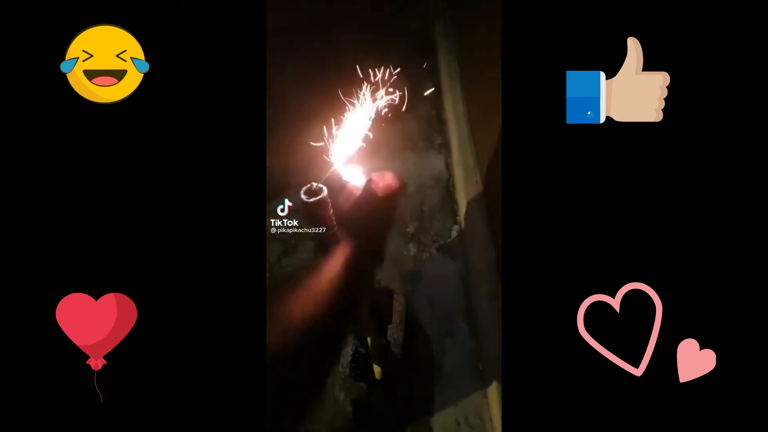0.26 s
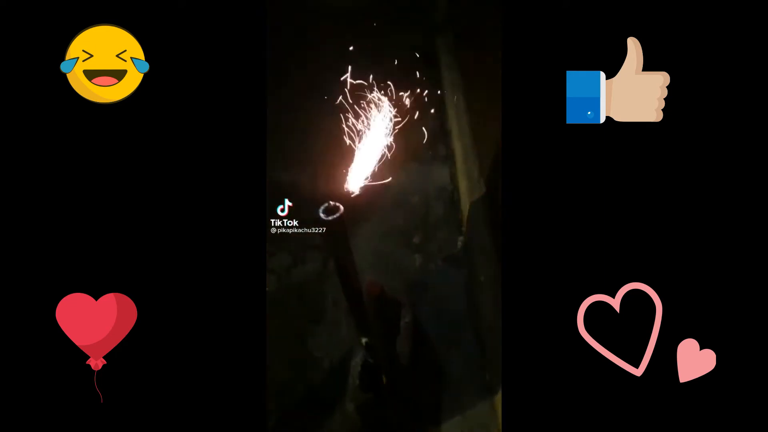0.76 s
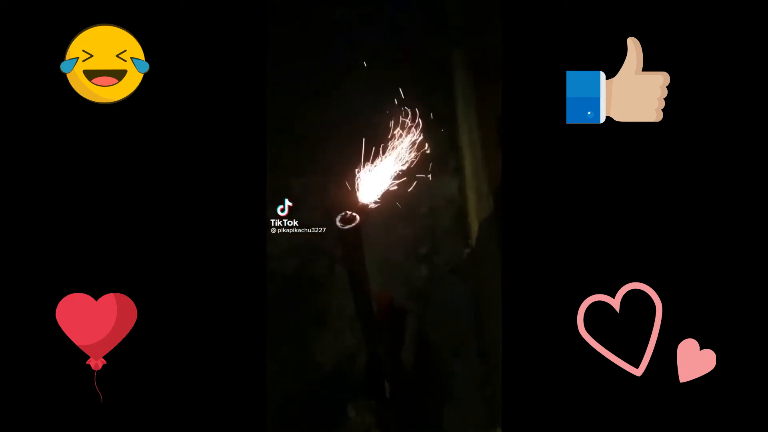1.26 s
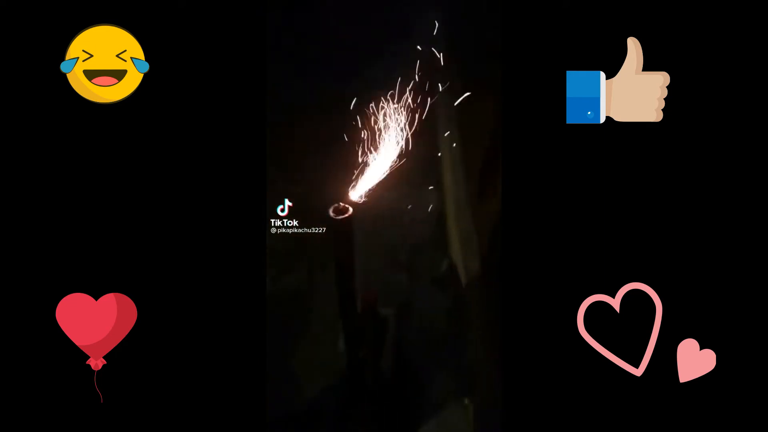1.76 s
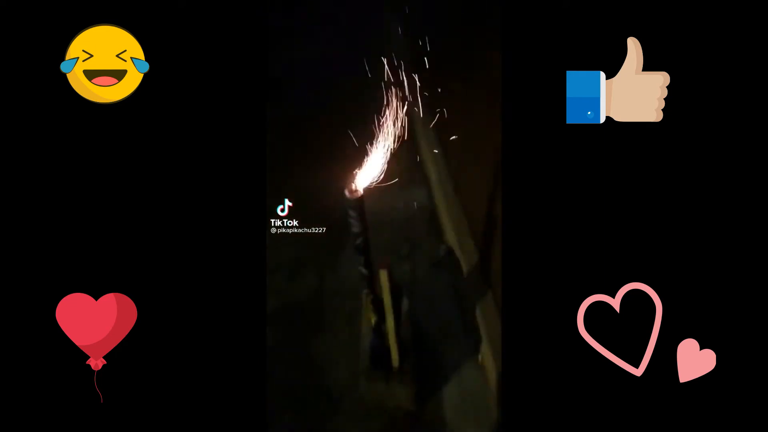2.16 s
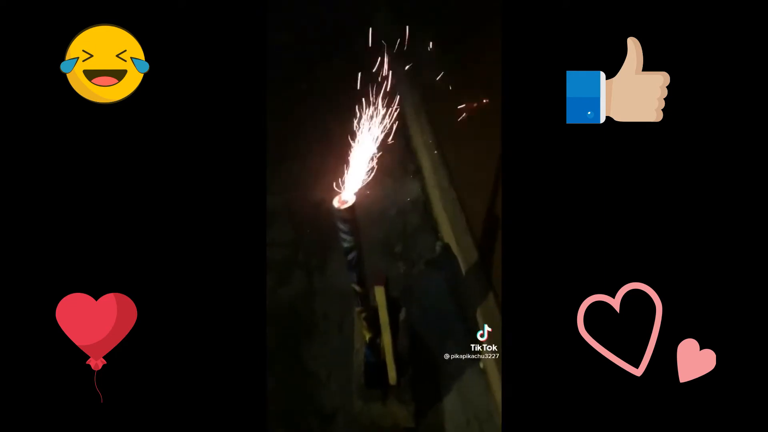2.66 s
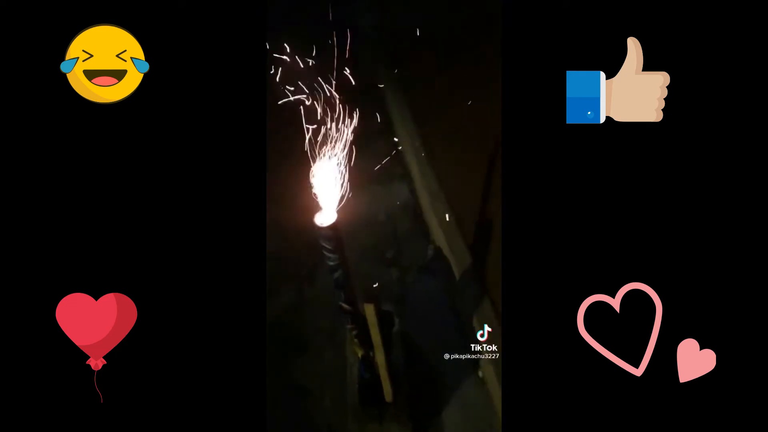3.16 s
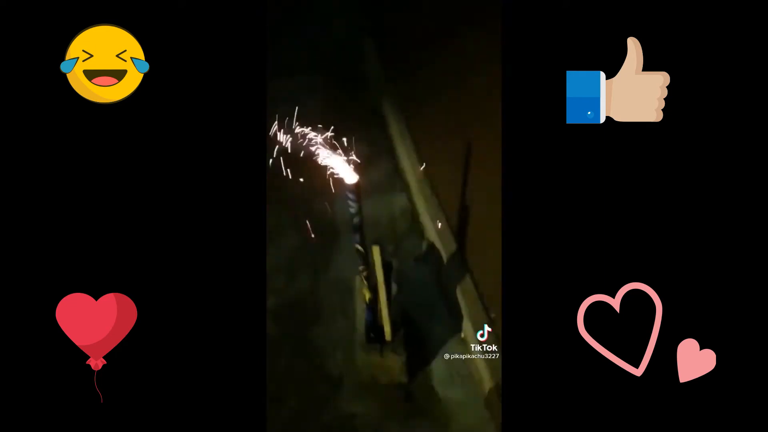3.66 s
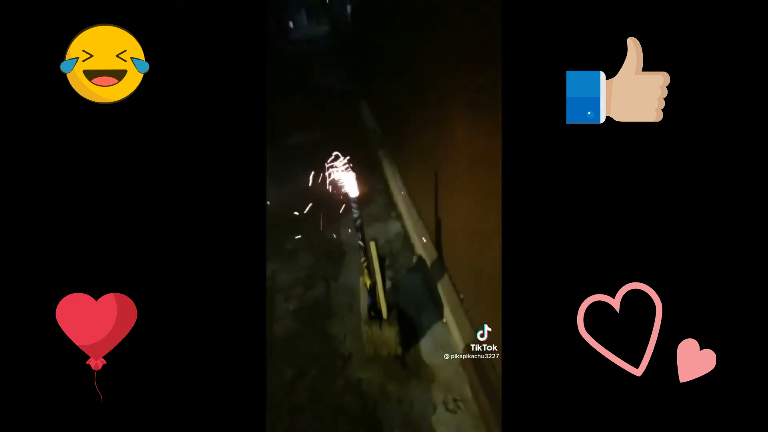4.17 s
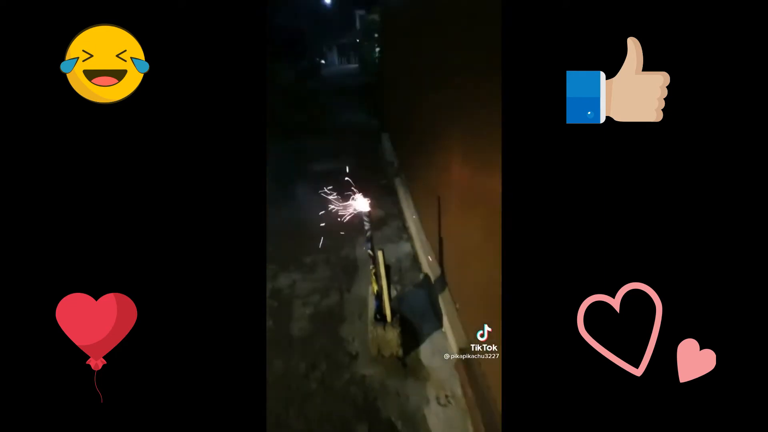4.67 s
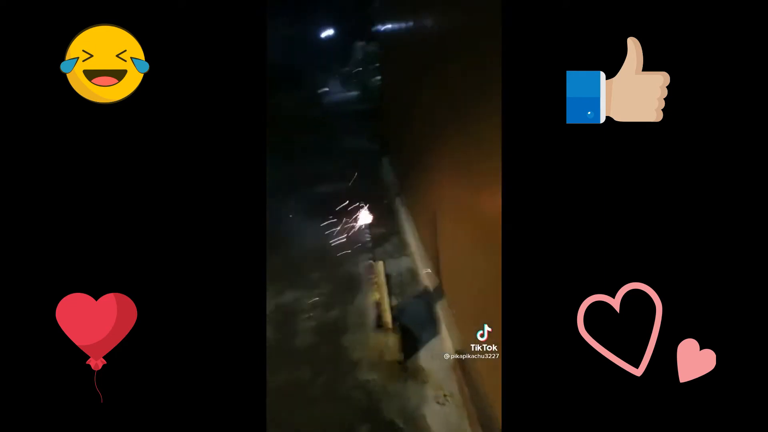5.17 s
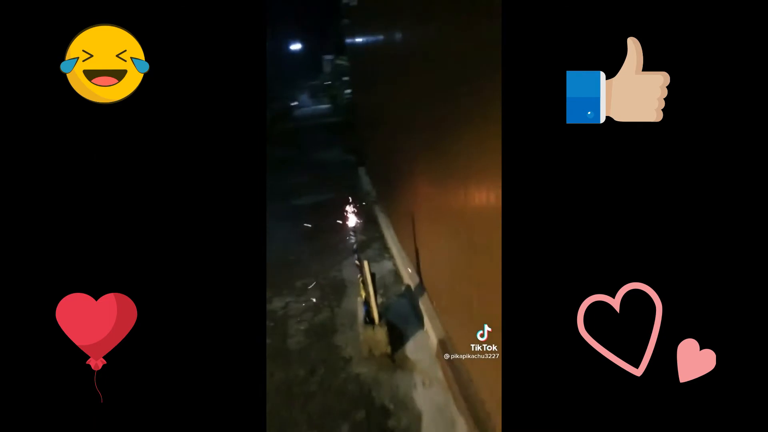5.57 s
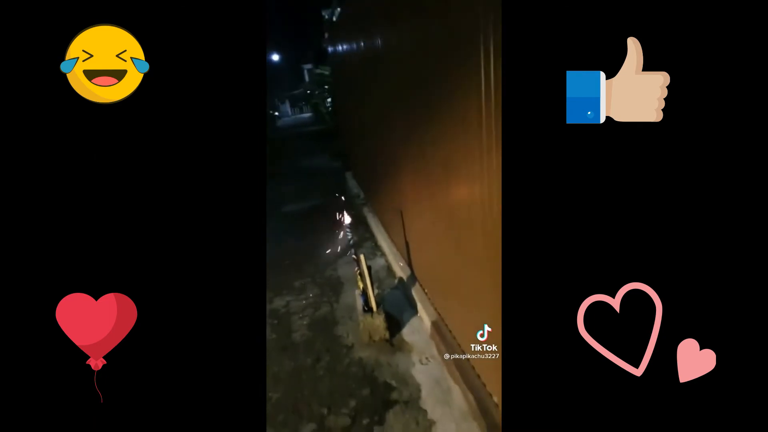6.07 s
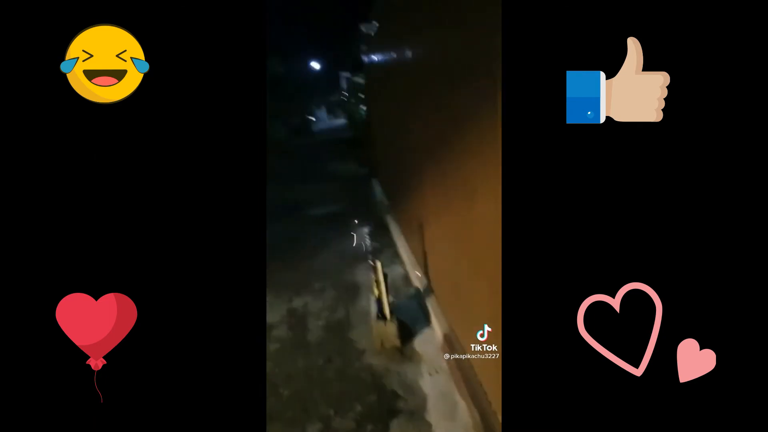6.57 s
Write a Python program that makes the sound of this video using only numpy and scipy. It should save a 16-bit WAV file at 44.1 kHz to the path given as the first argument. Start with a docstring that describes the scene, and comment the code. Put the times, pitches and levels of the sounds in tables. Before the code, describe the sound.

Bright sputtering fuse hiss fades down a tube amid low wind thumps, then one dry firework bang echoes and crickets chirp on.

```python
"""Outdoors at night, on a street: a firework fuse burns, its spark jet (coloured noise plus random grains) hissing and
spitting. The jet turns hollow as the flame sinks into the tube, and fades.
The charge goes off with one sharp crack, built of noise bursts, that echoes along the street.
Gusts of low noise and short pressure pulses buffet the single microphone.
Behind lie crickets (swept sine strokes over a noise chorus), air noise and a faint hum of sines."""
import sys
import numpy as np
from scipy import signal
from scipy.fft import rfft, irfft, next_fast_len
from scipy.io import wavfile
from scipy.ndimage import uniform_filter1d, map_coordinates

SR = 44100
rng = np.random.default_rng(int(sys.argv[2]) if len(sys.argv) > 2 else 0)


def generate_wav(sig):
    """Save sig (samples, or channels by samples) to the path in sys.argv[1] as 16-bit PCM at SR."""
    pcm = np.round(np.clip(np.atleast_2d(sig).T, -1, 1) * 32767).astype(np.int16)
    wavfile.write(sys.argv[1], SR, pcm)


N = 300762
T = np.arange(N) / SR
SLOW_T = np.arange(0, N / SR + .001, .00025)   # coarse clock [s]

# flame sinking into the tube: (time [s], depth [0-1], first tube resonance [Hz])
SINKING = [(0, 0.04, 1800), (2.5, 0.02, 1720), (2.9, 0.16, 1670), (3.3, 0.17, 1810), (3.65, 0.37, 1910),
           (4.15, 0.53, 1690), (4.7, 0.85, 2040), (5.3, 0.82, 1920), (6.0, 1, 1920)]
# short level dips of hiss and background air: (time [s], dip [dB], length [s])
FALTERS = [(.153, 3, .03), (.8, 2.5, .06), (1.151, 3, .02), (1.267, 5, .024), (1.454, 4, .022),
           (1.591, 4, .026), (2.01, 5, .018), (2.151, 4, .018), (2.637, 2.5, .02), (2.846, 2.5, .016),
           (2.892, 4, .02), (3.495, 8, .02), (4.426, 5, .02), (4.566, 6, .024), (4.717, 5, .032),
           (4.798, 3, .016), (4.87, 7, .018), (4.937, 3, .014), (5.007, 4, .016), (5.261, 5, .018),
           (5.309, 7, .018), (5.494, 6, .018), (5.55, 4, .025), (5.587, 4, .018), (5.657, 9, .016),
           (5.748, 3, .018)]
# short level dips of the far echo and background air: (time [s], dip [dB], length [s])
AIR_DIPS = [(6.021, 9, .03), (6.33, 5, .022), (6.422, 10, .052), (6.774, 6, .018)]
# bang and its returns from walls: (time [s], rms at peak [dB], t60 [s], bass edge [Hz], treble edge [Hz])
BANG_ARRIVALS = [(6.1246, -39, 0.28, 100, 14000), (6.125, -38.5, 0.016, 200, 14000),
                 (6.1285, -32, 0.018, 200, 14000), (6.1295, -34.5, 0.018, 5000, 14000),
                 (6.1335, -38, .012, 200, 14000), (6.141, -40, .03, 300, 6000),
                 (6.154, -39.5, .04, 2000, 14000), (6.163, -42, .06, 300, 7000),
                 (6.173, -41, .025, 1500, 9000), (6.1905, -43.5, .04, 1200, 3000),
                 (6.192, -52, .2, 4000, 14000), (6.218, -41.5, 0.025, 2000, 2700),
                 (6.2242, -42, 0.02, 1400, 8000), (6.252, -51, 0.08, 1500, 2600),
                 (6.259, -48, 0.06, 1550, 1950), (6.32, -58, 0.1, 1500, 2200)]


def from_db(db):
    """Decibels to gain."""
    return 10 ** (np.asarray(db) / 20)


def rms_one(x):
    """Scale to rms 1."""
    return x / np.sqrt(np.mean(x ** 2) + 1e-20)


def in_time(rows, t=T):
    """Each column of a curve at the times t."""
    s, *columns = np.transpose(rows)
    return [np.interp(t, s, c) for c in columns]


def at_hz(points, hz):
    """A spectrum in dB, straight on a log-frequency axis."""
    f, db = np.transpose(points)
    return np.interp(np.log(np.maximum(hz, 1)), np.log(f), db)


def noise(spectrum, source=None):
    """White noise, or another source, given a colour that falls away beyond its ends; rms 1."""
    source = rng.standard_normal(N) if source is None else source
    hz = np.arange(N // 2 + 1) * SR / N + 1e-3
    low_skirt = np.minimum(1, hz / spectrum[0][0]) ** 2
    high_skirt = np.minimum(1, spectrum[-1][0] / hz) ** 4
    gain = from_db(at_hz(spectrum, hz)) * low_skirt * high_skirt
    return rms_one(irfft(rfft(source) * gain, N))


def drift(rate_hz):
    """Slow chance up to about rate_hz; spread 1."""
    size = next_fast_len(len(SLOW_T))
    hz = np.arange(size // 2 + 1) / (size * SLOW_T[1])
    slow = irfft(rfft(rng.standard_normal(size)) / (1 + (hz / rate_hz) ** 2), size)
    return np.interp(T, SLOW_T, rms_one(slow[:len(SLOW_T)]))


def patches(shape, size=5):
    """Chance alike over a few hundred Hz and a few hundredths of a second; spread 1."""
    field = rng.standard_normal(shape)
    field = uniform_filter1d(field, size, axis=0)
    return rms_one(uniform_filter1d(field, size, axis=1))


def filtered(x, edge_hz, kind, order=2):
    """Causal Butterworth filter."""
    edge_hz = np.clip(edge_hz, 10, .45 * SR)
    return signal.sosfilt(signal.butter(order, edge_hz, kind, fs=SR, output="sos"), x)


def burst(start_s, t60_s, rise_s):
    """Envelope with a quick rise and an exponential fall."""
    age = np.maximum(T - start_s, 0)
    fall = np.exp(-np.minimum(np.log(1000) * age / t60_s, 40))
    return (1 - np.exp(-age / rise_s)) * fall


def dips(rows):
    """Short, steep-sided drops of level: gain over time."""
    drop_db = np.zeros(N)
    for s, db, length_s in rows:
        u = 2 * (T - s) / length_s
        drop_db += db * np.exp(-np.minimum(u ** 2, 5) ** 2)
    return from_db(-drop_db)


def evened(x, window_s):
    """Hold a noise near rms 1 over short windows, keeping its finer lumps."""
    size = max(int(window_s * SR), 2)
    power = uniform_filter1d(uniform_filter1d(x ** 2, size), size)
    return x / np.sqrt(power + 1e-6)


def sparks(per_s, spread_db):
    """Sharp grains bursting at random, most small and a few large; rms 1."""
    sizes = from_db(spread_db * np.minimum(rng.exponential(1, N), 5))
    signs = rng.choice([-1, 1], N)
    return rms_one(sizes * signs * (rng.random(N) < per_s / SR))


def fuse():
    """A sputtering gas jet full of sparks, coloured by the tube and by nearby surfaces."""
    # roar of the flame, which flares as it reaches the tube: (time [s], level [dB])
    roar_rows = [(0.1, -52), (0.18, -47.5), (1.0, -48.5), (1.8, -49), (1.92, -54), (2.5, -53.5),
                 (2.73, -47), (2.84, -48), (3.45, -46.5), (3.73, -50.5), (3.83, -47.5), (3.9, -54.5),
                 (4.67, -51), (5.49, -57), (5.55, -61.5), (5.93, -62.5), (6.0, -65.5)]
    # sizzle of the sparks: (time [s], level [dB])
    sizzle_rows = [(0.1, -43.5), (0.2, -36), (0.6, -36.5), (1.02, -40), (1.1, -45), (1.3, -40.5),
                   (1.48, -44.5), (1.64, -40.5), (2.12, -39.5), (2.22, -44.5), (2.37, -37.5), (2.53, -45.5),
                   (2.68, -39), (2.71, -46.5), (2.755, -35.5), (2.8, -48.5), (2.96, -39), (3.45, -43),
                   (3.52, -46), (3.95, -50), (4.0, -43.5), (4.1, -51.5), (5.97, -67), (6.0, -93)]
    light_s, out_s, patchy_db = 0.072, 6.04, 2.5
    hz, t, frames = signal.stft(with_reflections(spark_jet()), SR, nperseg=512)
    # each sputter has its own colour
    colour = jet_colour(hz, t) * from_db(patchy_db * patches(frames.shape))

    def band_gain(rows, low_hz, high_hz):
        """Gain that brings the band to its level curve."""
        band = (hz > low_hz) & (hz < high_hz)
        return from_db(in_time(rows, t)[0]) / np.sqrt((colour[band] ** 2).sum(0) / len(hz))

    # roar sets the middle of the spectrum, sizzle the top
    roar = band_gain(roar_rows, 700, 2800)
    sizzle = band_gain(sizzle_rows, 7500, 14500)
    high = np.clip(at_hz([(2200, 0.11), (7500, 0.81)], hz), 0, 1)[:, None]
    hiss = signal.istft(frames * colour * roar ** (1 - high) * sizzle ** high, SR)[1][:N]
    lighting = np.clip((T - light_s) / .015, 0, 1)
    dying = np.clip(1 - (T - out_s) / .06, 0, 1)
    return hiss * lighting * dying * dips(FALTERS)


def spark_jet():
    """Gas noise plus bursting powder grains; starved of air down the tube, the flame sputters more."""
    spark_db, sputter_db, sunk_sputter_db, flicker_db = -5, 1.08, 0.23, 0.1
    jet = rng.standard_normal(N) + from_db(spark_db) * sparks(per_s=3000, spread_db=1.8)
    depth = in_time(SINKING)[0]
    sputter = (sputter_db + sunk_sputter_db * depth) * drift(3.0)
    return jet * from_db(sputter + flicker_db * drift(210))


def with_reflections(jet):
    """Delayed copies off tube, ground and rough surfaces comb the jet; rms 1."""
    # (time [s], near delay [ms], near share [gain], far delay [ms])
    reflection_rows = [(0.1, .88, .12, 1.57), (0.8, .88, .15, 1.54), (1.1, .89, .3, 1.5),
                       (1.6, .9, .33, 1.46), (2.25, .89, .33, 3.0), (2.9, 1.03, .25, 3.9),
                       (3.5, .92, .33, 3.9), (3.85, .76, .3, 3.5), (4.15, .66, .33, 3.3),
                       (4.5, .535, .36, 2.95), (4.9, .48, .36, 2.72), (5.3, .46, .36, 2.55),
                       (6.1, .48, .36, 2.33)]
    far_share = .17
    near_ms, near_share, far_ms = in_time(reflection_rows)
    near = near_share * reflected(jet, near_ms)
    far = far_share * reflected(jet, far_ms)
    return rms_one(jet + near + far + scattered(jet, near_ms / near_ms[0]))


def reflected(x, delay_ms):
    """A copy that arrives later by a changing delay."""
    return map_coordinates(x, [np.arange(N) - delay_ms * SR / 1000], order=3)


def scattered(x, stretch, count=9):
    """Weak reflections off rough pavement and wall, whose drifting paths stretch with the near one."""
    min_ms, max_ms, joint_share, wander = 1.3, 5.5, .62, .045   # wander: relative drift of each path
    total = np.zeros(N)
    for k, ms in enumerate(rng.uniform(min_ms, max_ms, count)):
        path_ms = ms * stretch * (1 + wander * drift(.6))
        total += (-1) ** k * reflected(x, path_ms)
    return joint_share * total / np.sqrt(count)


def bell(hz, centre_hz, width_hz):
    """Shape of a moving resonance, 1 on top: frequencies x moments."""
    return 1 / (1 + ((hz[:, None] - centre_hz) / width_hz) ** 2)


def jet_colour(hz, t):
    """The hiss turns hollow as the flame sinks, and the tube starts to ring: gain by frequency and moment."""
    # jet in the open: (frequency [Hz], density [dB])
    open_jet = [(180, -1.5), (300, -1), (420, -14.5), (520, -5), (680, -2.5), (1300, -1.5), (1750, -0.5),
                (2150, -2), (3300, -4), (4300, -5), (5500, -4), (7500, 0.5), (9000, -5), (11400, 1.5),
                (13500, 1), (14600, -5.5)]
    # jet down the tube: (frequency [Hz], density [dB])
    sunk_jet = [(250, -34), (700, -24), (1000, -23.5), (1600, -14), (2300, -15), (3050, -21.5), (3500, -17),
                (5000, -15.5), (6500, -13.5), (8200, -25.5), (9500, -22.5), (11400, -20.5), (13000, -25),
                (14600, -29)]
    # first tube resonance: (width [Hz], lift when fully sunk [dB])
    tube = (390, 16.2)
    # tube mouth resonances: (frequency [Hz], width [Hz], lift [dB], strongest at depth [0-1])
    mouth = [(1814, 190, -5, 0), (7360, 340, -3, 0.2), (5300, 440, 12, 0.23), (6540, 380, -7, 0.12),
             (7630, 110, 8, 0.14), (9140, 430, 10.5, 0.14), (10870, 580, 9.5, 0.22),
             (7240, 1400, -16, 0.58), (8900, 590, 12, 0.58), (8050, 330, -8, 0.74), (4900, 140, 0, 1),
             (11900, 400, 12, 0.91), (6300, 280, -1, 0.85)]
    # colour while the lighting hand is beside the fuse: (frequency [Hz], width [Hz], lift [dB])
    hand = [(760, 300, -3), (1840, 72, -13), (2020, 81, 5), (3260, 68, -27), (3970, 100, 7), (4200, 95, 3),
            (6100, 470, 8), (9200, 220, -11), (9560, 140, 8), (10000, 130, -3), (11100, 160, -9),
            (13000, 160, -4)]
    # band cancelled by a reflection: (time [s], frequency [Hz], width [Hz], dip [dB])
    hollow = [(0.1, 3300, 248, 0.5), (0.75, 3440, 246, 2), (1.05, 3060, 300, -2.5), (2.3, 3000, 500, 2),
              (2.95, 2070, 400, 7), (3.3, 2580, 400, 8), (3.42, 3530, 750, 15), (3.68, 3560, 800, 28),
              (3.85, 3240, 600, 5), (4.05, 3700, 600, 11), (4.2, 4080, 660, 17), (4.45, 4660, 600, 8),
              (4.9, 4660, 600, 4)]
    mouth_reach = 0.097   # change of depth over which a mouth resonance fades
    hand_away_s, hand_leaves_s = 0.58, 0.45   # half gone at; pace of leaving
    hollow_ragged = .4   # spread as a share of the dip

    depth, tube_hz = in_time(SINKING, t)
    db = np.outer(at_hz(open_jet, hz), 1 - depth) + np.outer(at_hz(sunk_jet, hz), depth)
    width_hz, lift_db = tube
    db = db + depth * lift_db * bell(hz, tube_hz, width_hz)
    for centre_hz, width_hz, lift_db, best_depth in mouth:
        strength = np.exp(-((depth - best_depth) / mouth_reach) ** 2)
        db = db + lift_db * bell(hz, centre_hz, width_hz) * strength
    hand_near = (1 - np.tanh((t - hand_away_s) / hand_leaves_s)) / 2
    for centre_hz, width_hz, lift_db in hand:
        db = db + hand_near * lift_db * bell(hz, centre_hz, width_hz)
    hollow_hz, hollow_width_hz, dip_db = in_time(hollow, t)
    ragged = 1 + hollow_ragged * patches(db.shape)
    return from_db(db - dip_db * ragged * bell(hz, hollow_hz, hollow_width_hz))


def spits():
    """Pockets of powder flare in short puffs of band noise."""
    # (time [s], rms at peak [dB], pitch [Hz], t60 [s])
    spit_rows = [(0.783, -44, 254, 0.086), (0.917, -45.5, 574, 0.23), (0.945, -48.5, 210, 0.28),
                 (0.953, -45, 950, 0.21), (0.956, -41, 1810, 0.087), (1.826, -47.5, 1500, 0.09),
                 (2.428, -31, 2500, 0.021), (2.734, -35, 1340, 0.092), (2.738, -38.5, 254, 0.1),
                 (2.74, -38.5, 686, 0.14), (2.787, -37, 1080, 0.038), (4.375, -45.5, 1780, 0.058),
                 (4.622, -50, 2000, 0.14), (5.866, -48.5, 2000, 0.022)]
    out = np.zeros(N)
    for s, db, hz, t60_s in spit_rows:
        puff = rms_one(filtered(rng.standard_normal(N), [hz * .65, hz * 1.4], "band"))
        out += from_db(db) * puff * burst(s, t60_s, rise_s=.0005)
    return out


def bang():
    """A shock front, its crackling scatter, a puff of air, a few rings, then a far roll."""
    return shock_front() + air_puff() + crackling_blast() + bang_rings() + far_roll()


def shock_front():
    """A push and an equal suction within a fraction of a millisecond."""
    snap_s, snap_db, half_ms = 6.1303, -25, .08
    u = (T - snap_s) * 1000 / half_ms
    return -2 * from_db(snap_db) * u * np.exp(-u ** 2)


def air_puff():
    """The pushed air reaches the microphone: one slow pulse with suction on both sides."""
    puff_s, peak_db, half_ms = 6.186, -32.5, 6.2
    u = (T - puff_s) * 1000 / half_ms
    return from_db(peak_db) * (1 - 2 * u ** 2) * np.exp(-u ** 2)


def crackling_blast():
    """Noise and separate shocks scatter off pavement and walls in a train of decaying arrivals."""
    # (frequency [Hz], density [dB])
    blast_colour = [(100, -5), (250, 10), (400, -16), (700, 2), (1100, -2), (1600, 3), (2500, -5),
                    (3500, -7.5), (6100, -4.5), (7600, -3), (8700, -11), (9600, -5), (11000, 0), (14600, 0)]
    crackle_db, scatter_db = .5, 2.5   # crackle against smooth noise; spread of level
    shocks = rng.standard_normal(N) + from_db(crackle_db) * sparks(per_s=900, spread_db=2.6)
    blast = evened(noise(blast_colour, shocks), window_s=0.0055) * from_db(scatter_db * drift(300))
    out = np.zeros(N)
    for s, db, t60_s, low_hz, high_hz in BANG_ARRIVALS:
        arrival = np.roll(blast, rng.integers(N))
        arrival = rms_one(filtered(arrival, [low_hz, high_hz], "band"))
        out += from_db(db) * arrival * burst(s, t60_s, rise_s=.0003)
    return out


def bang_rings():
    """Tube and pavement ring as decaying sines; a wall sends the ringing back."""
    # (frequency [Hz], level [dB], t60 [s])
    ring_rows = [(386, -28.5, 0.077), (507, -35, 0.26), (842, -45, 0.4), (1830, -45, 0.2),
                 (2410, -46, 0.35)]
    return_s, return_db = 6.164, -9   # return level against the first
    start_s = BANG_ARRIVALS[0][0]
    out = np.zeros(N)
    for hz, db, t60_s in ring_rows:
        first = burst(start_s, t60_s, rise_s=0.0038)
        returned = from_db(return_db) * burst(return_s, t60_s / 2, rise_s=0.0023)
        tone = np.sin(2 * np.pi * hz * (T - start_s) + drift(48))
        out += from_db(db) * tone * (first + returned)
    return out


def far_roll():
    """Coloured noise: the bang rolling back from far down the street."""
    # (time [s], level [dB])
    echo_rows = [(6.12, -100), (6.18, -52.5), (6.3, -59), (6.41, -73), (6.54, -70.5), (6.6, -61),
                 (6.67, -63), (6.78, -78)]
    # (frequency [Hz], density [dB])
    far_colour = [(400, 1.5), (1000, -12), (1600, 1.5), (2300, -0.5), (3000, -20), (4000, -12.5),
                  (8000, -10), (14600, -12)]
    far_db, = in_time(echo_rows)
    return from_db(far_db + 0.81 * drift(30)) * noise(far_colour) * dips(AIR_DIPS)


def wind():
    """Lumpy pressure on the microphone port: rumble, slow sway, flutter and fine eddies, each a noise band."""
    # each colour: (frequency [Hz], density [dB])
    rumble_colour = [(22, -41), (31, -28), (42, -3), (60, 1.5), (90, -3), (130, -11), (190, -46)]
    flutter_colour = [(90, -12.5), (135, 6.5), (190, 1), (260, -10), (350, -20.5), (500, -25.5),
                      (750, -51.5), (1200, -61)]
    sway_colour = [(24, -23), (34, 5.5), (46, -1), (64, -17.5)]   # slow, large eddies that stay when the wind drops
    eddy_colour = [(200, 5.5), (330, 6.5), (480, -13.5), (700, -14.5), (950, -30)]   # fine turbulence of strong gusts
    rumble_trim_db, flutter_trim_db, lumpy_db = -0.8, -2.0, 2.0
    sway_db, sway_follows, lull_db = -52.5, 0.73, -50.5   # sway in a lull, share of wind swing, wind in a lull
    eddy_db, strong_gust_db, eddy_growth = -39, -25, 1.7
    low_db, high_db = wind_levels()
    high_db = high_db + lumpy_db * drift(51)
    out = from_db(low_db + rumble_trim_db) * evened(noise(rumble_colour), window_s=0.56)
    out += from_db(sway_db + sway_follows * (low_db - lull_db)) * noise(sway_colour)
    out += from_db(high_db + flutter_trim_db) * evened(noise(flutter_colour), window_s=0.033)
    # fine eddies grow faster than the gust, so strong gusts sound brighter
    fine_db = eddy_db + eddy_growth * (high_db - strong_gust_db) + 0.95 * drift(43)
    return out + from_db(fine_db) * noise(eddy_colour) + buffets()


def wind_levels():
    """Each gust swells quickly and dies away on top of the breeze: dB of rumble and of flutter."""
    # rumble between gusts, before trim: (time [s], level [dB])
    breeze = [(0.04, -46), (0.66, -45.5), (0.96, -54), (1.31, -55.5), (1.75, -35.5), (2.05, -41.5),
              (2.35, -66.5), (2.5, -49.5), (2.67, -86), (2.75, -49), (2.89, -53), (3.66, -31), (4.26, -48),
              (4.81, -32), (5.39, -37.5), (6.05, -55), (6.35, -56), (6.6, -42), (6.72, -48.5),
              (6.82, -36.5)]
    # gusts, before trim: (peak time [s], rumble [dB], flutter [dB], length [s])
    gusts = [(0.123, -35, -44.5, 0.12), (0.207, -35, -41, 0.021), (0.313, -28, -37.5, 0.0088),
             (0.396, -25.5, -57, 0.013), (0.554, -52, -42, 0.076), (0.69, -39.5, -44.5, 0.067),
             (1.425, -32, -45, 0.041), (1.614, -26.5, -41, 0.062), (1.736, -29, -38.5, 0.04),
             (1.79, -27.5, -41, 0.015), (1.947, -26, -40.5, 0.021), (3.091, -24.5, -44, 0.0046),
             (3.176, -31, -55, 0.013), (3.355, -30, -29.5, 0.0089), (3.477, -28.5, -37.5, 0.014),
             (3.668, -29, -34, 0.024), (3.702, -11.5, -27.5, 0.012), (3.779, -26, -33, 0.047),
             (3.828, -22, -27.5, 0.0096), (3.885, -22, -29, 0.032), (3.961, -19.5, -30, 0.038),
             (4.054, -19.5, -25.5, 0.038), (4.092, -21, -23.5, 0.055), (4.265, -21.5, -26.5, 0.077),
             (4.309, -26.5, -21, 0.031), (4.416, -25, -33.5, 0.046), (4.518, -28.5, -30, 0.029),
             (4.594, -32, -31.5, 0.045), (4.893, -41, -23, 0.021), (4.992, -34, -34.5, 0.037),
             (5.091, -50, -30, 0.013), (5.169, -36, -37.5, 0.041), (5.281, -40, -36, 0.02),
             (5.34, -37, -28.5, 0.027), (5.544, -30.5, -38.5, 0.05), (5.698, -30, -31.5, 0.019),
             (5.779, -33, -37.5, 0.028), (5.883, -30, -38.5, 0.052)]
    breeze_flutter_db = -15.5   # against the breeze's rumble
    gust_rise, flutter_sharpness = 0.62, 1.41   # rise per length; flutter comes and goes faster
    rumble = from_db(in_time(breeze, SLOW_T)[0]) ** 2
    flutter = rumble * from_db(breeze_flutter_db) ** 2
    for s, rumble_db, flutter_db, length_s in gusts:
        u = (SLOW_T - s) / length_s
        swell = np.exp(-np.minimum(np.where(u < 0, (u / gust_rise) ** 2, u), 20))
        rumble = rumble + (from_db(rumble_db) * swell) ** 2
        flutter = flutter + (from_db(flutter_db) * swell ** flutter_sharpness) ** 2
    return [np.interp(T, SLOW_T, 10 * np.log10(power)) for power in (rumble, flutter)]


def buffets():
    """The hardest eddies slap the port: a push followed by a slower, weaker suction."""
    # (time [s], peak before trim [dB], duration [ms])
    buffet_rows = [(0.387, -23, 2.7), (0.713, -22.5, 2.2), (1.392, -16.5, 3.7), (1.831, -28.5, 0.66),
                   (3.355, -19.5, 2.24), (3.873, -19, 1.07), (4.1, -14.5, 0.67), (4.294, -16, 0.83),
                   (4.388, -15.5, 1.3), (4.892, -12.5, 1.12), (5.212, -19.5, 1.85), (5.341, -34, 1.8),
                   (5.701, -19.5, 2.06)]
    trim_db = -1
    out = np.zeros(N)
    for s, db, ms in buffet_rows:
        u = (T - s) * 1000 / ms
        push, suction = np.exp(-u ** 2), 0.11 * np.exp(-((u - 3) / 2.1) ** 2)
        out += from_db(db + trim_db) * (push - suction)
    return out


def crickets():
    """The nearest cricket chirps in four wing strokes that fall in pitch; a chorus throbs behind."""
    # far crickets: (frequency [Hz], density [dB])
    chorus_colour = [(4800, -48), (5500, -32), (5950, -5), (6200, -5.5), (6420, -1), (6700, -10),
                     (7050, -15), (7800, -60)]
    # nearest cricket: (time [s], peak [dB])
    chirp_rows = [(4.75, -50), (4.92, -62), (5.07, -52), (5.2, -54), (5.36, -53), (5.49, -52.5),
                  (5.64, -50.5), (5.772, -52), (5.918, -52), (6.029, -48.5), (6.252, -53), (6.41, -51.5),
                  (6.555, -49), (6.675, -48), (6.803, -47.5)]
    # level of each wing stroke of a chirp [dB]
    stroke_levels_db = [-1, 0, -6, -6]
    stroke_gap_s, stroke_s, top_hz, fall_hz = 0.017, .014, 6600, 450
    jitter_s, jitter_hz, chorus_db = .0015, 70, -60.0
    out = from_db(chorus_db + 2.5 * drift(23)) * noise(chorus_colour)
    rasp = drift(340)
    for s, db in chirp_rows:
        for k, stroke_db in enumerate(stroke_levels_db):
            late, sharp = rng.standard_normal(2)
            start_s = s + k * stroke_gap_s + jitter_s * late
            at = np.flatnonzero((T >= start_s) & (T < start_s + stroke_s))
            u = (T[at] - start_s) / stroke_s
            stroke_hz = top_hz + jitter_hz * sharp - fall_hz * u
            phase = 2 * np.pi * np.cumsum(stroke_hz) / SR + .5 * rasp[at]
            out[at] += from_db(db + stroke_db) * np.sin(np.pi * u) * np.sin(phase)
    return out


def night():
    """Still air as coloured noise, whose level dips now and then, and slightly wavering sine hums."""
    # (frequency [Hz], density [dB])
    air_colour = [(200, -4), (420, 1), (650, 1), (950, -38), (1700, -4), (2400, 1), (3000, -40),
                  (3500, -6.5), (4300, -26), (5200, 3.5), (7600, -2), (9500, -11), (12000, 1), (14600, 2.5)]
    # distant tones: (frequency [Hz], mean rms level [dB])
    hum_rows = [(3435, -83.5), (5152, -76.5)]
    # low hum: (time [s], mean rms level [dB])
    drone_rows = [(0, -60.5), (3.3, -64), (4.6, -70), (6.1, -68.5), (6.4, -71.5), (6.55, -71.5),
                  (6.82, -64)]
    drone_hz, waver_db, air_db = 548, 1.2, -63.5
    out = from_db(air_db) * noise(air_colour) * dips(FALTERS) * dips(AIR_DIPS)
    for hz, db in [(drone_hz, in_time(drone_rows)[0]), *hum_rows]:
        tone = np.sqrt(2) * np.sin(2 * np.pi * hz * T + 0.7 * drift(4.8))
        out += from_db(db + waver_db * drift(9)) * tone
    return out


def scene():
    """Everything reaches one microphone, the same in both channels."""
    mono = fuse() + spits() + bang() + wind() + crickets() + night()
    return np.stack([mono, mono])


def record(dry):
    """The deepest bass and the top are cut."""
    cutoff_hz = 14620
    x = filtered(dry, 32.4, "high")
    return signal.sosfilt(signal.ellip(12, .1, 80, cutoff_hz, fs=SR, output="sos"), x)


dry = scene()
out = record(dry)
generate_wav(out)
```